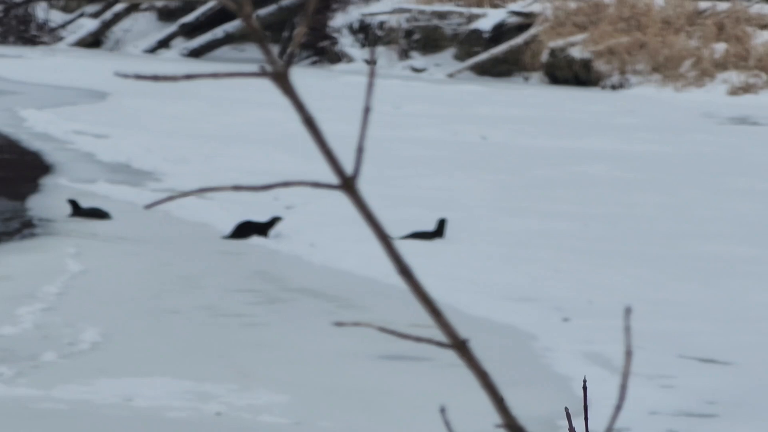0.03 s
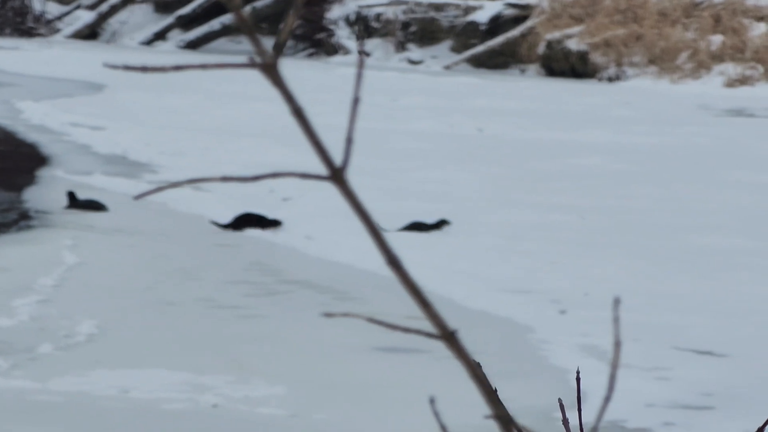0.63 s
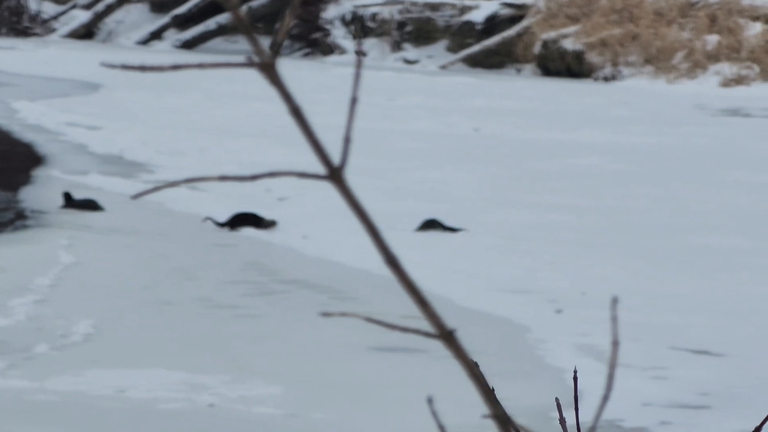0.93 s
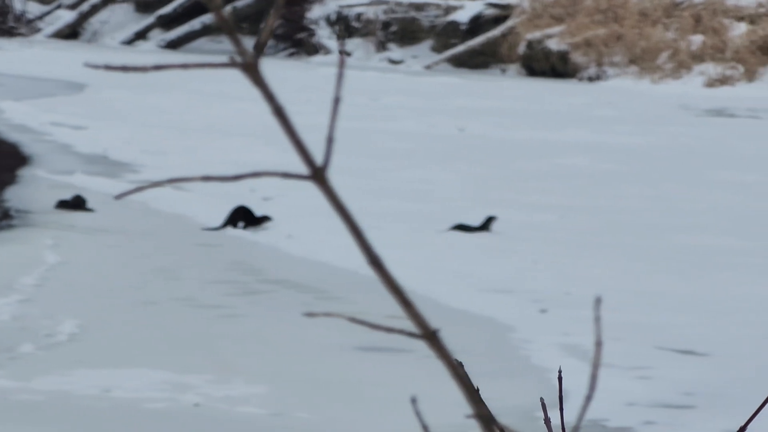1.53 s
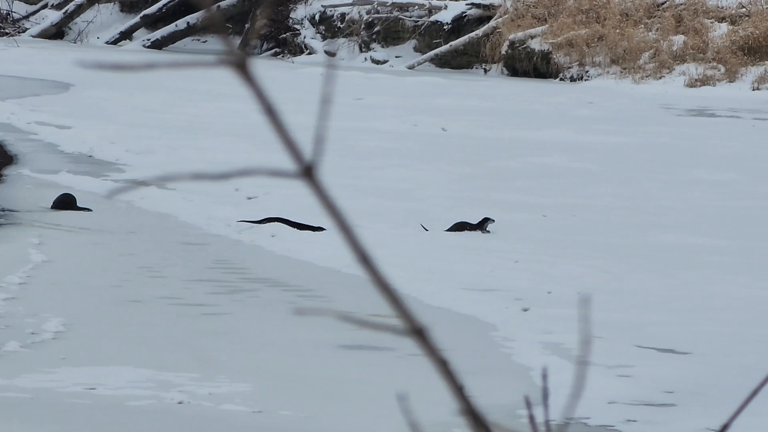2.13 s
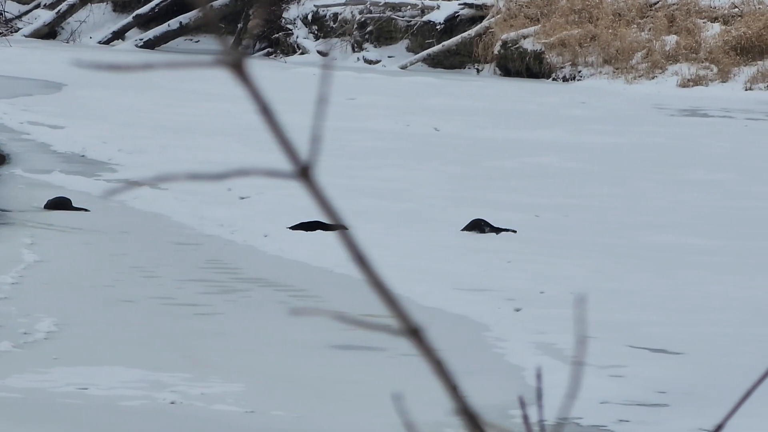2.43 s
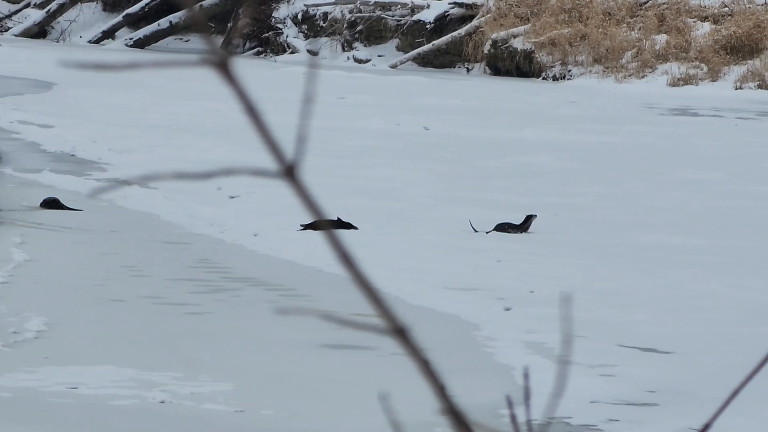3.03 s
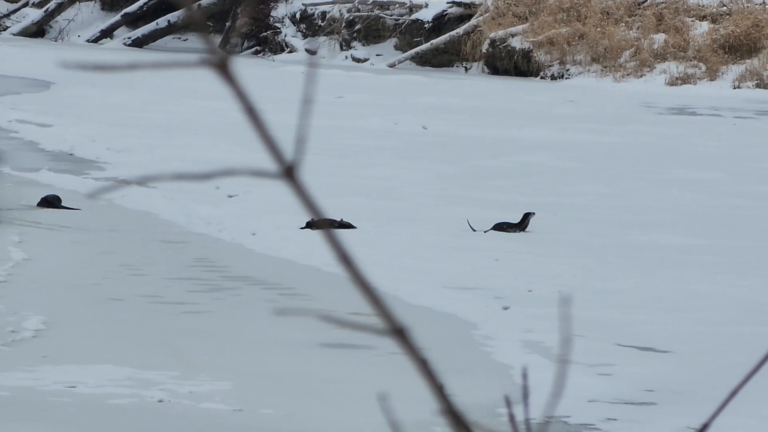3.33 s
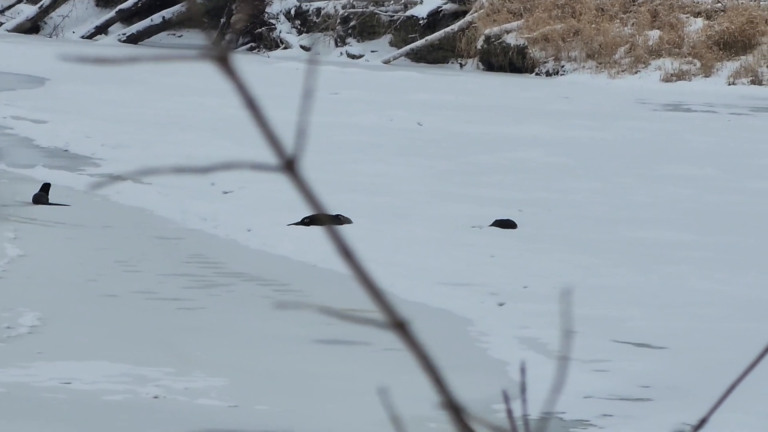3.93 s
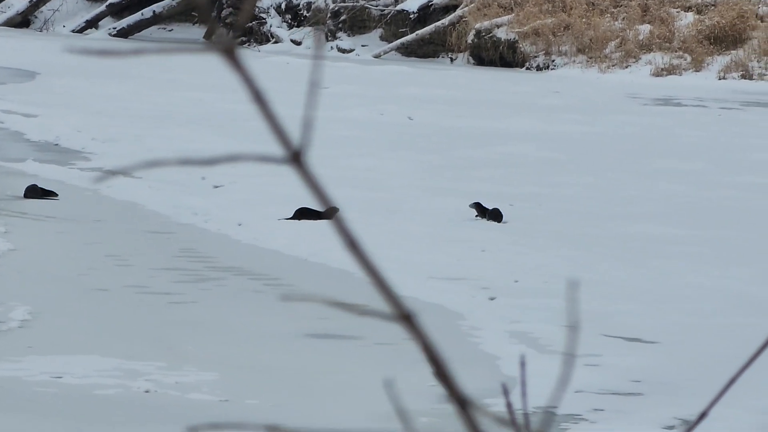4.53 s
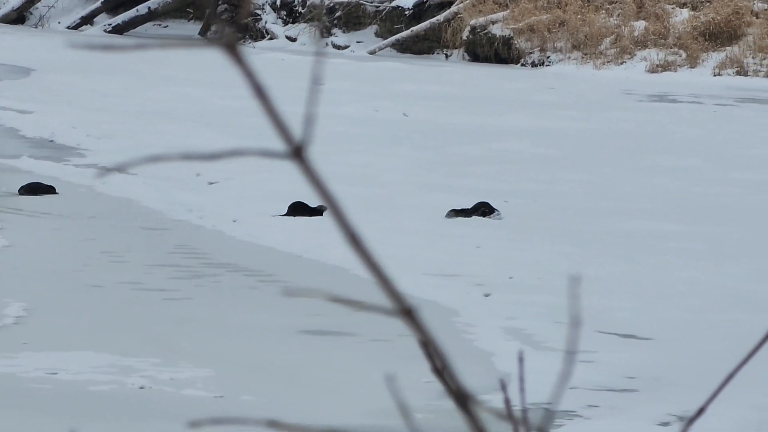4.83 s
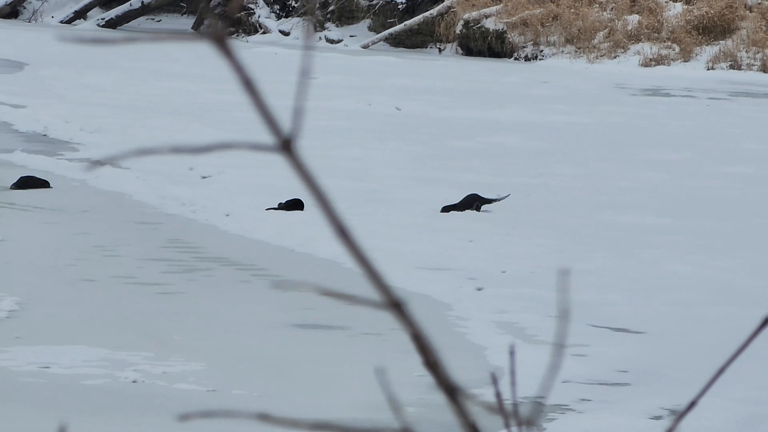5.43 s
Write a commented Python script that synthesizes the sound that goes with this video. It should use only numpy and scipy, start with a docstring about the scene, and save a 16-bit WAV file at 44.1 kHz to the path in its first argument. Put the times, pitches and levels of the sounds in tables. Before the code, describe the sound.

A low, gusty rumble of light wind buffets a hand-held microphone by a frozen river, with faint open-air hiss behind.

```python
"""A low, uneven rumble of light wind, with short gusts and thumps, on the bank of a frozen river.
Swirls of air (eddies) push on the two microphone openings (ports) of a hand-held camera, so each
side rumbles on its own. The strongest gust hits the right side near four seconds. Behind the wind
lie a faint open-air hiss, a far low moan, a few soft knocks and one click of the camera body."""
import sys
import numpy as np
from scipy import signal
from scipy.fft import rfft, irfft
from scipy.io import wavfile
from scipy.ndimage import uniform_filter1d

SR = 44100
rng = np.random.default_rng(int(sys.argv[2]) if len(sys.argv) > 2 else 0)


def waveform_to_disk(signal):
    """Save audio, clipped to [-1, 1], as 16-bit WAV at the path in sys.argv[1]."""
    frames = np.transpose(np.atleast_2d(signal))
    scaled = np.clip(frames, -1, 1) * 32767
    samples = np.round(scaled).astype(np.int16)
    wavfile.write(sys.argv[1], SR, samples)


N = 250047
TIME, FREQS = np.arange(N) / SR, np.fft.rfftfreq(N, 1 / SR)

# The tone of the open-air hiss, with a very faint electronic hiss above 9 kHz: frequency_hz, relative_db
HISS_TONE = [(60, -1), (200, -1), (300, -6), (480, -8.5), (700, -11), (1200, -13.5), (1450, -11),
             (1650, -15), (2000, -14), (2600, -18.5), (3500, -19), (4000, -22.5), (4900, -22.5),
             (7400, -34), (9300, -46), (12500, -33.5)]
# How the hiss sinks and dulls: time_s, relative_db, treble_tilt_db_per_octave
HISS_CHANGES = [(0.1, -66, 0.59), (0.8, -66.5, 0.049), (1.6, -67, 0.15), (2.6, -67.5, -0.15),
                (3.999, -68, -0.31), (5.6, -68, -0.63)]
# Which side the hiss leans to: frequency_hz, left_minus_right_db
HISS_BALANCE = [(200, 4.5), (380, 0.5), (700, -6), (1300, -7), (2400, -5.5), (4400, -5.5), (8100, 6.5),
                (13000, -3.5)]
# How alike the hiss is on both sides: frequency_hz, likeness (1 = the same)
HISS_LIKENESS = [(100, 1), (300, 0.15), (640, 0.073), (1400, 0.027), (3000, 0.025)]
# Swells of the far moan: start_s, hold_s, level_db
FAR_MOAN_SWELLS = [(0.1, .06, -69), (2.446, 0.32, -72), (3.001, 0.069, -75.5), (4.932, 0.015, -68.5),
                   (5.14, 0.018, -70)]
# Soft knocks: time_s, level_db, pitch_hz, fade_s, left_minus_right_db
SOFT_KNOCKS = [(2, -69, 834, 0.023, -3), (2.074, -69, 820, 0.0075, 4), (2.087, -58, 826, 0.0048, -2),
               (2.104, -71, 760, 0.015, -1), (2.16, -66, 800, 0.021, -1), (2.26, -71, 750, 0.013, -5)]
# The quick contacts that make up one click: start_s, relative_db, treble_tilt_db_per_octave
CLICK_CONTACTS = [(1.493, -47.5, 3), (1.4941, -51, -2), (1.4951, -48.5, -0.5)]
# The notes the camera body rings with: pitch_hz, relative_db, ring_s (time to fade by 60 dB)
BODY_NOTES = [(614, -5, 0.013), (1010, -1.5, 0.0072), (2000, 4.5, 0.0045), (2560, -9, 0.014),
              (4360, -5, 0.0088), (5330, -8.5, 0.007), (7240, -6.5, 0.0025), (9700, -13.5, 0.0034),
              (12400, -28, .003)]
# Single eddies that hit a port: time_s, push_db, pitch_hz, flutter_db, port (0 left, 1 right)
EDDY_THUMPS = [(0.198, -41.5, 95, -56, 0), (1.437, -58, 140, -54.5, 0), (1.6, -32, 84, -67, 1),
               (1.804, -24.5, 88, -66, 0), (3.346, -22, 55.7, -63.5, 0), (3.559, -28, 95.5, -68, 1),
               (3.756, -23, 49, -55, 1), (3.916, -13, 45.5, -50.5, 1), (4.028, -14, 102.4, -42.5, 1),
               (4.062, -16, 81.6, -60, 1), (4.155, -39, 108, -68, 1)]
# The tone of an eddy breaking up on the rim of a port: frequency_hz, relative_db
FLUTTER_TONE = [(90, -15.5), (190, 6), (260, 3.5), (350, -3), (480, -16), (700, -30), (1500, -47),
                (4000, -85)]
# The breeze between gusts, mostly stronger on the left: time_s, left_db, right_db
BREEZE_STRENGTH = [(0.1, -40, -59.5), (0.9, -42, -55.5), (1.2, -38, -52), (2.5, -40.5, -61),
                   (3.4, -38, -53), (3.7, -47, -51.5), (4.25, -51, -55), (4.5, -41, -50),
                   (5.1, -43.5, -50.5), (5.6, -39.5, -44)]
# Gusts on top of the breeze: start_s, hold_s, left_db, right_db
WIND_GUSTS = [(1.068, 0.059, -55, -50), (1.325, 0.038, -31.5, -59), (1.581, 0.12, -34, -36.5),
              (1.801, 0.027, -29.5, -45.5), (1.923, 0.032, -34.5, -62), (2.207, 0.012, -30, -49),
              (2.69, 0.026, -37, -40), (2.975, 0.22, -36, -41.5), (3.342, 0.036, -28, -40.5),
              (3.427, 0.17, -35, -35), (3.798, 0.16, -34.5, -29.5), (3.896, 0.037, -32.5, -25.5),
              (4.023, 0.033, -29.5, -26.5), (4.367, 0.022, -61, -44), (4.47, 0.12, -35, -65),
              (4.841, 0.051, -32.5, -46), (5.572, 0.25, -41, -35), (5.657, .03, -32, -25)]
# The tones of large, slow eddies and of small, fast ones: frequency_hz, relative_db
LARGE_EDDY_TONE = [(10, -41), (22, -15.5), (32, 0.5), (42, 0.5), (54, 1.5), (72, -8), (100, -20.5),
                   (140, -30), (200, -44.5), (400, -72.5), (900, -100)]
SMALL_EDDY_TONE = [(35, -19.5), (70, 1.5), (105, -2), (135, -14), (170, -16), (220, -36.5), (350, -45.5),
                   (500, -60), (1200, -92.5)]


def gain_of(db):
    """Turns decibels into a number to multiply a sound by."""
    return 10 ** (np.asarray(db) / 20)


def unit_level(sound):
    """Scales a sound so its average level (rms) is 1."""
    return sound / np.sqrt(np.mean(sound ** 2) + 1e-20)


def over_pitch(table, hz=FREQS):
    """Reads a table at each frequency, joining its points on a scale of octaves."""
    table_hz, values = np.transpose(table)
    return np.interp(np.log(hz + 1), np.log(table_hz + 1), values)


def over_time(table, column=1):
    """Reads one column of a table at every sample."""
    table = np.array(table)
    return np.interp(TIME, table[:, 0], table[:, column])


def noise(gain):
    """Noise of level 1, shaped by a gain for each frequency."""
    return unit_level(irfft(rfft(rng.standard_normal(N)) * gain, N))


def band(hz, width_hz):
    """Gains that keep only the frequencies near one pitch."""
    return 1 / (1 + ((FREQS - hz) / width_hz) ** 2)


def steadied(sound, span_s):
    """Takes the slow swells out of a noise and leaves its quick flutter."""
    window = np.exp(-(np.arange(-8000, 8001) / SR / span_s) ** 2)
    nearby_power = signal.fftconvolve(sound ** 2, window / window.sum(), "same")
    return sound / np.sqrt(nearby_power + 0.02)


def swell(start_s, hold_s, rise_s, fade_s):
    """A loudness curve that rises to 1 by start_s, holds and dies away."""
    early, late = np.maximum(start_s - TIME, 0), np.maximum(TIME - start_s - hold_s, 0)
    return np.exp(-(early / rise_s) ** 2 - late / fade_s)


def background_hiss(patchy_db=1.19):
    """Wide open-air hiss that slowly sinks and dulls, with a very faint electronic hiss above 9 kHz."""
    # The hiss is drawn on a grid of frequencies and short time slices, then turned into sound.
    slices, hz = N // 256 + 5, np.fft.rfftfreq(1024, 1 / SR)
    draws = rng.standard_normal((slices, len(hz), 5)).T
    left, unrelated = draws[0] + 1j * draws[1], draws[2] + 1j * draws[3]
    patches = unit_level(uniform_filter1d(uniform_filter1d(draws[4], 10, axis=0), 20, axis=1))
    time_s, _, tilt_db = np.transpose(HISS_CHANGES)
    octaves = np.log2(np.maximum(hz, 500) / 500) * (hz < 9000)  # only 500-9000 Hz is tilted
    treble_db = octaves[:, None] * np.interp(np.arange(slices) * 256 / SR, time_s, tilt_db)
    likeness = over_pitch(HISS_LIKENESS, hz)[:, None]
    right = likeness * left + np.sqrt(1 - likeness ** 2) * unrelated
    lean = gain_of(over_pitch(HISS_BALANCE, hz) / 2)[:, None]
    grid = np.array([left * lean, right / lean])
    grid *= gain_of(over_pitch(HISS_TONE, hz)[:, None] + treble_db + patchy_db * patches)
    hiss = signal.istft(grid, nperseg=1024, noverlap=768)[1][:, :N]
    return gain_of(over_time(HISS_CHANGES) + 1.5) * unit_level(hiss)


def far_moan(spread=0.51, rest_db=-84.5):
    """A far, low drone that swells and fades, nearly alike on both sides."""
    tone = band(hz=329.5, width_hz=40)
    shared = steadied(noise(tone), span_s=0.072)
    drone = unit_level(np.array([shared + spread * noise(tone) for port in range(2)]))
    swells = sum(gain_of(level_db) * swell(start_s, hold_s, rise_s=0.056, fade_s=0.12)
                 for start_s, hold_s, level_db in FAR_MOAN_SWELLS)
    return np.hypot(gain_of(rest_db), swells) * drone


def soft_knocks(width_share=0.2, spread=0.79):
    """Short, dull bursts of noise, each around one pitch."""
    out = np.zeros((2, N))
    spectrum = rfft(rng.standard_normal(N) + spread * rng.standard_normal((2, N)))
    for time_s, level_db, pitch_hz, fade_s, lean_db in SOFT_KNOCKS:
        ring = unit_level(irfft(spectrum * band(pitch_hz, pitch_hz * width_share), N))
        sides = gain_of([[level_db + lean_db / 2], [level_db - lean_db / 2]])
        out += sides * np.exp(-abs(TIME - time_s) / fade_s) * ring
    return out


def camera_click(left_db=-5, right_db=0):
    """Each contact rings the plastic body for a few milliseconds, differently at each port."""
    out = np.zeros((2, N))
    age_s = np.arange(1500) / SR
    for start_s, contact_db, tilt_db in CLICK_CONTACTS:
        first = round(start_s * SR)
        for pitch_hz, note_db, ring_s in BODY_NOTES:
            level_db = contact_db + note_db + tilt_db * np.log2(pitch_hz / 2000)
            ring = gain_of(level_db - 60 * age_s / ring_s) * np.sin(2 * np.pi * pitch_hz * age_s)
            out[:, first:first + len(age_s)] += rng.choice([-1, 1], (2, 1)) * ring
    return out * gain_of([[left_db], [right_db]])


def eddy_thumps(swing_cycles=0.97, flutter_cycles=1.7):
    """An eddy pushes on a port and flutters as it breaks up; slow eddies last longer."""
    out = np.zeros((2, N))
    flutter = steadied(noise(gain_of(over_pitch(FLUTTER_TONE))), span_s=0.017)
    for time_s, push_db, pitch_hz, flutter_db, port in EDDY_THUMPS:
        cycles = (TIME - time_s) * pitch_hz
        push = gain_of(push_db) * np.exp(-(cycles / swing_cycles) ** 2) * np.cos(2 * np.pi * cycles)
        breakup = gain_of(flutter_db) * np.exp(-(cycles / flutter_cycles) ** 2) * flutter
        out[int(port)] += push + breakup
    return out


def wind_strength_db(port, waver_db=2.0, waver_hz=8):
    """How hard the wind presses on one port: the wavering breeze plus the gusts."""
    waver = noise(band(waver_hz, waver_hz / 2) ** 2)
    power = gain_of(over_time(BREEZE_STRENGTH, column=1 + port) + waver_db * waver) ** 2
    for start_s, hold_s, *port_db in WIND_GUSTS:
        gust = gain_of(port_db[port]) * swell(start_s, hold_s, rise_s=0.025, fade_s=0.043)
        power += gust ** 2
    return 10 * np.log10(power)


def wind_rumble(strength_db, trim_db, small_db, small_growth):
    """Eddies batter one port: the harder it blows, the larger the share of small, fast ones."""
    small_share = gain_of(np.minimum(small_db + small_growth * (strength_db + 33), -3))
    large = noise(gain_of(over_pitch(LARGE_EDDY_TONE)))
    small = noise(gain_of(over_pitch(SMALL_EDDY_TONE)))
    return gain_of(strength_db + trim_db) * steadied(large + small_share * small, span_s=0.05)


def scene():
    """Wind on both ports over the quiet river bank."""
    left_db, right_db = wind_strength_db(port=0), wind_strength_db(port=1)
    left = wind_rumble(left_db, trim_db=-1, small_db=-12.5, small_growth=0.22)
    right = wind_rumble(right_db, trim_db=3, small_db=-6, small_growth=0.62)
    wind = np.array([left, right]) + eddy_thumps()
    return wind + background_hiss() + far_moan() + soft_knocks() + camera_click()


def record(dry, start_s=0.085, top_hz=15750):
    """The microphone opens after a moment of silence, and the highest treble is cut off."""
    opened = dry * np.clip((TIME - start_s) / 0.003, 0, 1)
    treble_cut = signal.firwin(511, top_hz, window=("kaiser", 9), fs=SR)
    return signal.oaconvolve(opened, treble_cut[None], "same")


dry = scene()
out = record(dry)
waveform_to_disk(out)
```